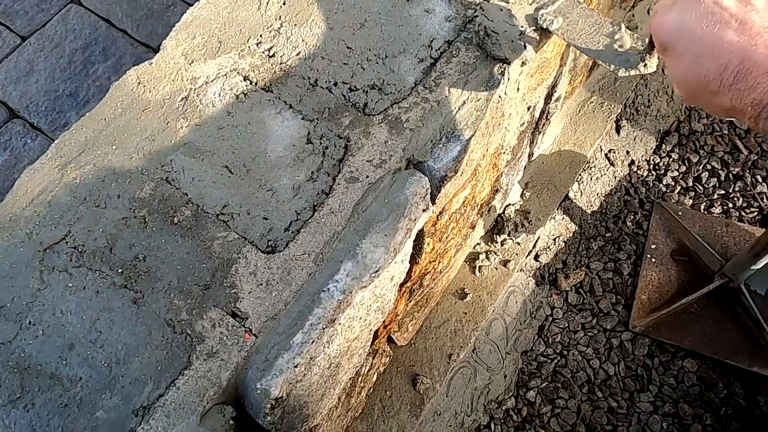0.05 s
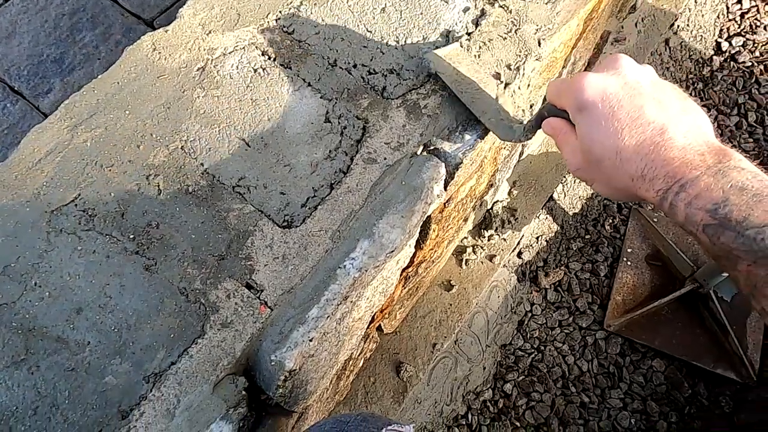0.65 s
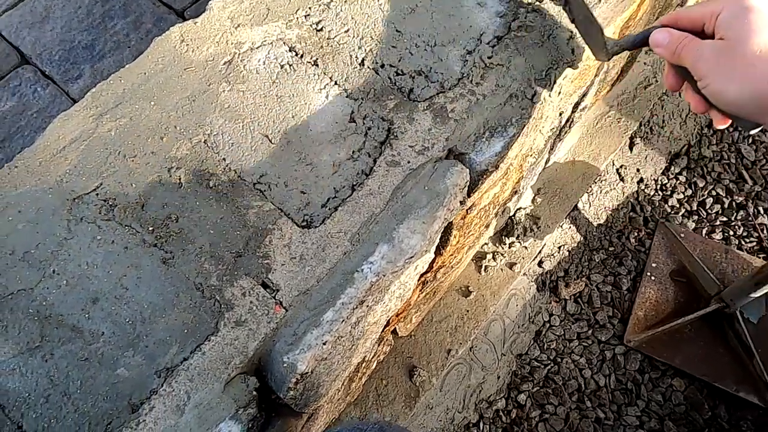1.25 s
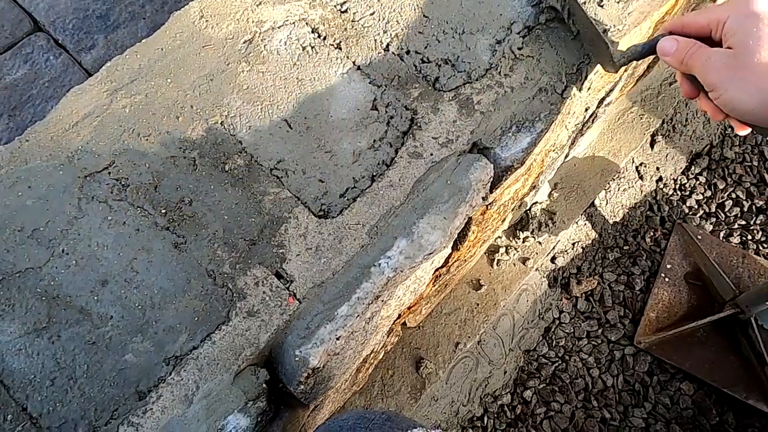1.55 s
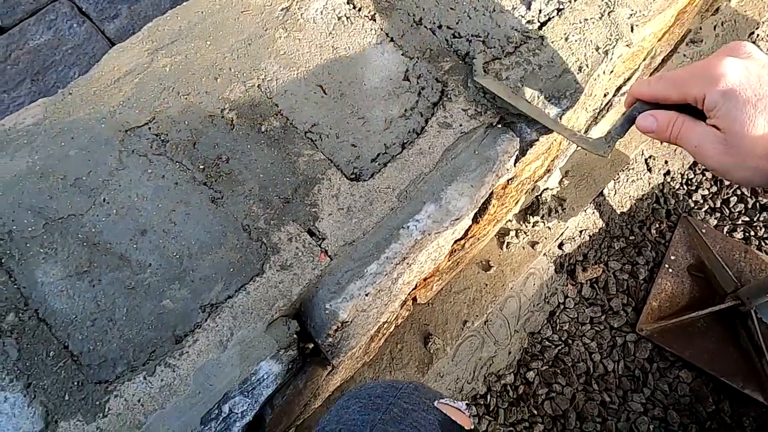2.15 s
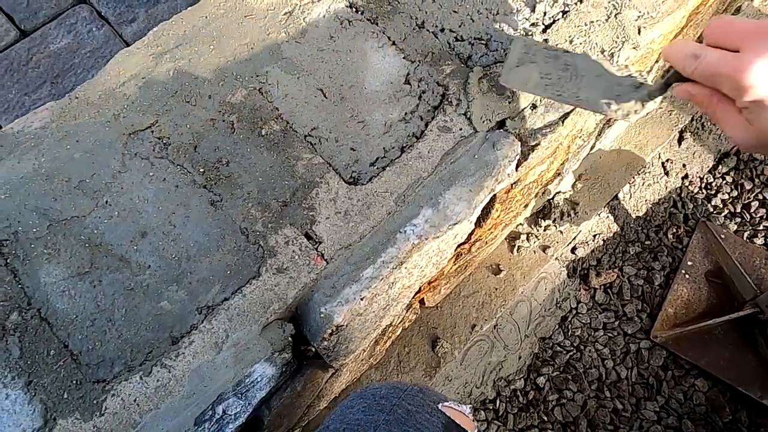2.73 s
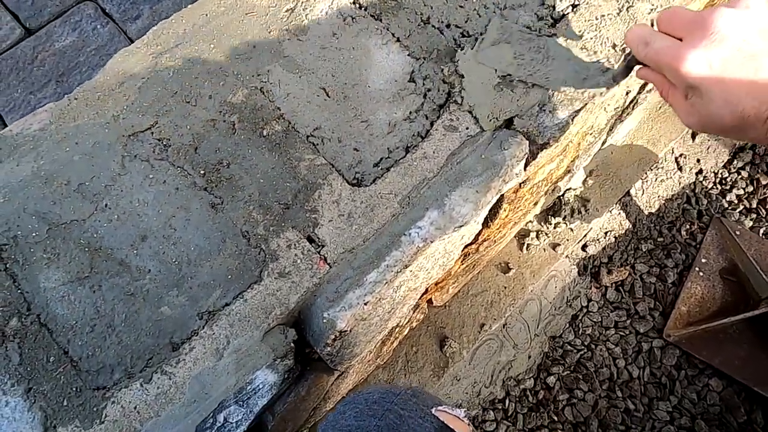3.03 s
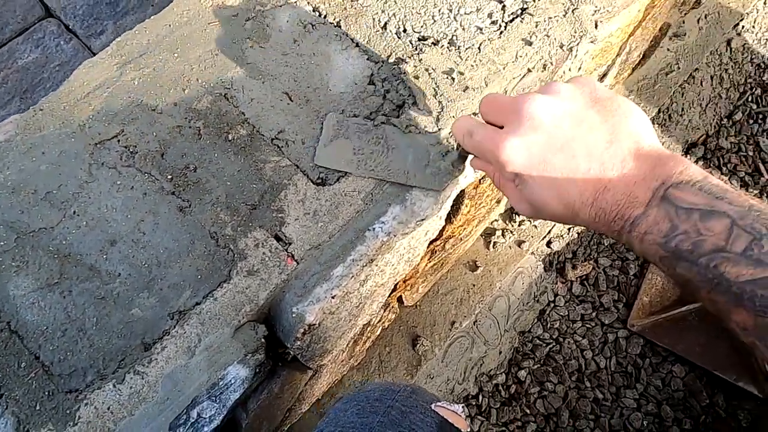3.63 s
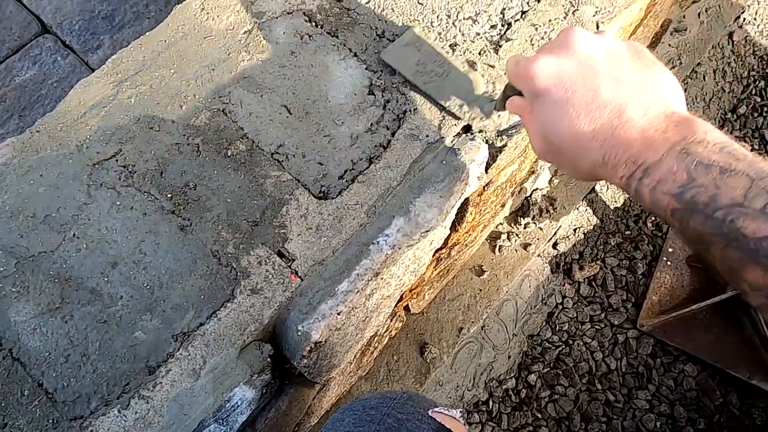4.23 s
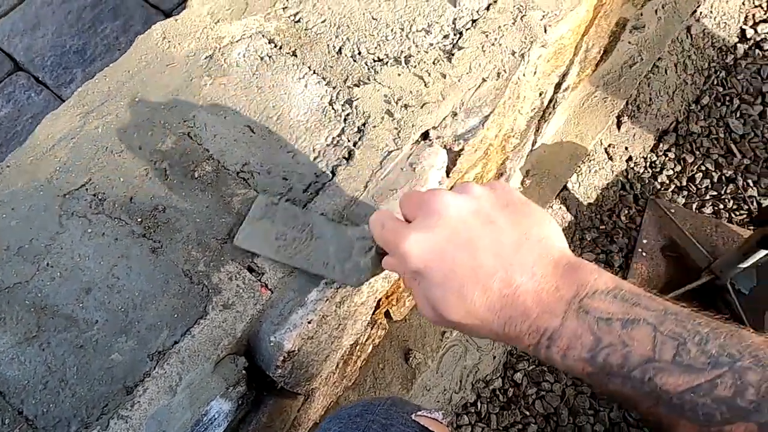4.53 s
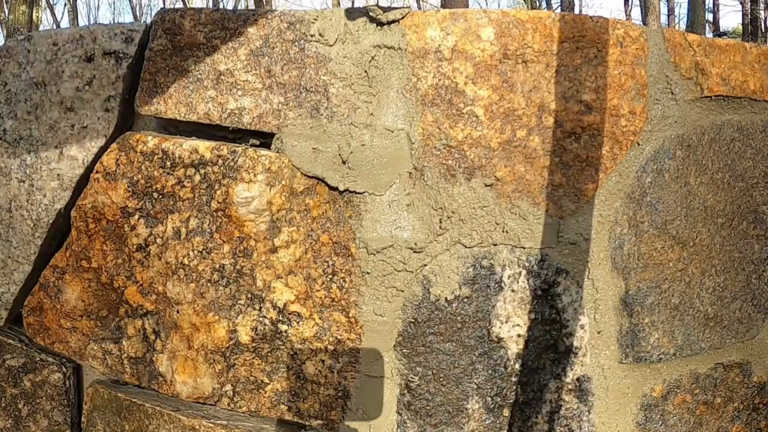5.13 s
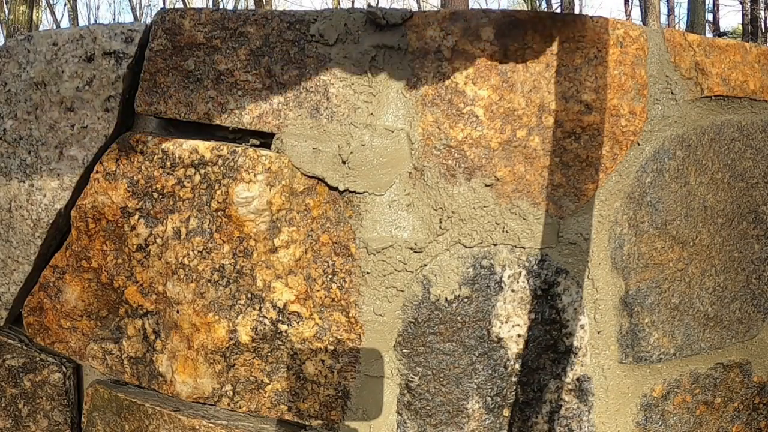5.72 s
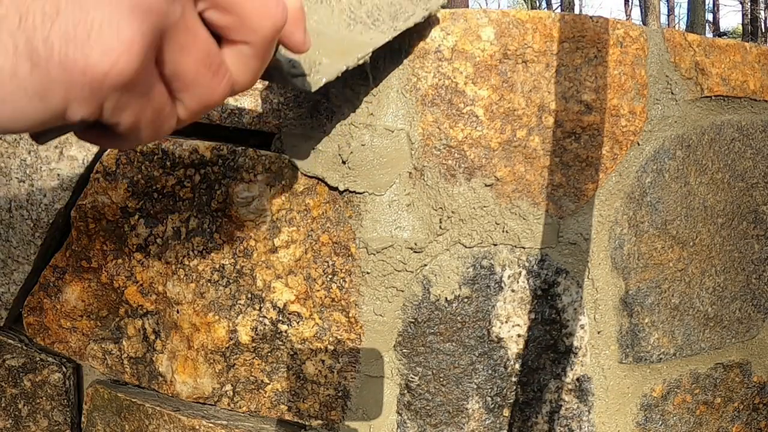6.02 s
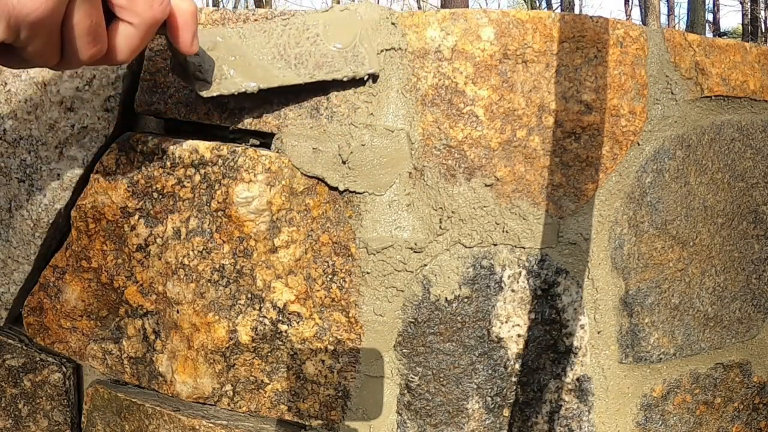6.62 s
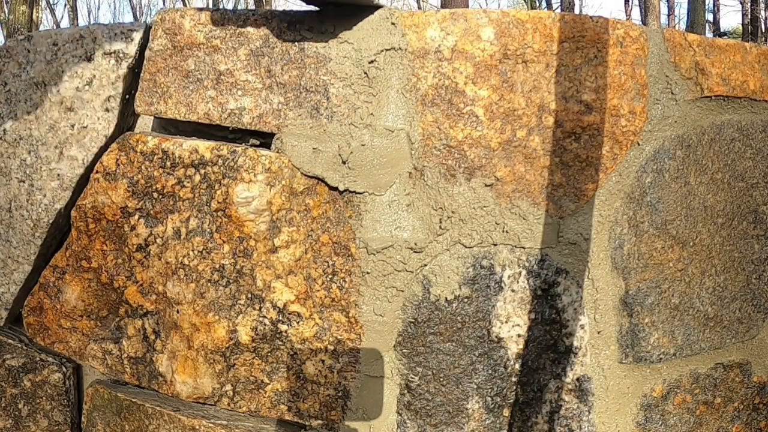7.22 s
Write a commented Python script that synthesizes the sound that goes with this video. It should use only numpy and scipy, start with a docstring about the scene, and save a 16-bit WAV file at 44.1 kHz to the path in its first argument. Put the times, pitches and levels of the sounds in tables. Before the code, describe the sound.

A steel trowel scrapes wet, sandy mortar into a stone wall, close by and outdoors. For the first second, quick gritty strokes make the blade ring briefly as grains catch under it. After a short gap, from about 1.4 seconds, the blade bears on stone and the scraping sounds hollower, with a slight knock. From 3 to about 4.6 seconds comes a loud, brighter run of strokes with a fine sandy fizz. After a pause, a short group follows from 5.2 to 5.6 seconds. Mostly lighter strokes return from 6.3 to 6.8 seconds, and a last small scrape comes at about 7.2 seconds. Coarse grains crack sharply under the edge along the way, the loudest slightly distorted. A faint low rumble continues in the distance throughout, with the faint hum of a far engine that swells a little between 5 and 6 seconds.

```python
"""A steel trowel scrapes wet mortar into a stone wall, outdoors, over a distant rumble and a faint hum.
It starts with quick strokes: sand grains catch under the blade and make the steel ring briefly.
From 1.4 s the blade bears on stone and sounds hollow. From 3 s comes a loud, brighter run of strokes.
After a pause, a short group follows at 5.2 s, then mostly lighter strokes from 6.3 s to the end.
Coarse grains crack along the way, and the loudest ones overload and flatten the sound's peaks."""
import sys
import numpy as np
from scipy import signal
from scipy.fft import rfft, irfft
from scipy.io import wavfile
from scipy.ndimage import uniform_filter1d

SR = 44100
rng = np.random.default_rng(int(sys.argv[2]) if len(sys.argv) > 2 else 0)


def transcribe(u):
    """Save the signal u as a 16-bit wav file named by the first command-line argument.

    u: samples, shape (n,) or (channels, n), limited to [-1, 1]; the rate is SR.
    q: integer samples, one column per channel.
    """
    v = np.clip(np.atleast_2d(u).T, -1, 1)
    q = np.round(v * 32767).astype(np.int16)
    wavfile.write(sys.argv[1], SR, q)


N = 320607
TIME = np.arange(N) / SR

# Tone of the distant rumble: pitch_hz, level_db
RUMBLE_TONE = [(15, -58), (55, -6), (100, -5), (195, -3), (300, -9), (400, -12), (570, -8.5), (850, -9.5),
               (1800, -18.5), (2800, -27), (4000, -36.5), (7000, -52.5), (9500, -58), (15000, -79)]
# The background level sinks and recovers over time: time_s, level_db
RUMBLE_LEVELS = [(0, -35), (.6, -37.5), (1.6, -33), (2, -36), (2.8, -31.5), (3.6, -39), (4.7, -38),
                 (5.3, -33.5), (5.8, -34.5), (6.4, -31), (6.7, -32.5), (7.27, -30.5)]
# How the hum of a far engine rises and falls: time_s, level_db
HUM_LEVELS = [(0, -46.5), (4.4, -62.5), (5.4, -37.5), (5.7, -47), (6.2, -38), (6.6, -62)]
# Strokes of the trowel. The swell runs from start to end; hollow, knock, sand and ring are shares:
# start_s, length_s, pressure_db, swell_db, hollow_db, knock_db, sand_db, pitch_hz, ring_db
STROKES = [(0, 0.11, -23, -13, -13, -38, -7.5, 2980, -7),
           (0.064, 0.023, -18, -1, -13, -15, -6.5, 2740, -10),
           (0.097, 0.067, -30.5, 8, -9, -22, -5, 2650, -3.5),
           (0.385, 0.063, -29.5, 13, -12, -23, -9, 2630.0, -19),
           (0.452, 0.062, -12, -1, -12, -42, -7.5, 2710, -24),
           (0.517, 0.091, -28.5, -11, -13, -19, -0.5, 3200, -19),
           (0.62, 0.15, -23, -0.5, -11.5, -24, -6, 2960, -19),
           (0.781, 0.026, -15, 1, 0.5, -23, -7, 2970, -23),
           (0.819, 0.064, -19.5, -0.5, 0.5, -16, -8, 3000, -18),
           (1.443, 0.038, -37.5, -3, 11.5, 1.5, 1, 2620.0, -23),
           (1.497, 0.068, -17.5, 6.5, -0.5, -6, -12.5, 2590, -22),
           (1.593, 0.08, -44, 11, -8, -8, -12, 2750, -22),
           (1.663, 0.096, -20, 3.5, 1.5, -4, -8.5, 2570, -20),
           (1.793, 0.086, -24.5, -5, 3.5, -7.5, -8, 2330, -16),
           (1.882, 0.122, -19.5, -3.5, -2, -12, -14, 2230, -10),
           (1.998, 0.14, -30, -2, -3, -6.5, -12.5, 2230, -19),
           (2.136, 0.23, -40.5, -23, -5.5, -16, -10, 2310.0, -13),
           (2.336, 0.22, -34, 7, -11, -13, -11.5, 2520, -23),
           (2.523, 0.16, -17.5, 10, -8, -18, -11, 2730, -15),
           (2.696, 0.027, -22, 0.5, -1, -31, -8.5, 2700, -4),
           (2.952, 0.18, -30, 18, -7, -14, -8.5, 2820, -13),
           (3.077, 0.13, -10, 3, -12, -27.5, -9.5, 3110, -10),
           (3.211, 0.072, -16.5, -16, -20.5, -35, -6, 2710, -8),
           (3.303, 0.041, -19.5, -11, -14, -24.5, -5, 2700, -8),
           (3.343, 0.056, -12.5, 0.5, -20.5, -40.5, -4, 3040, -8.5),
           (3.418, 0.019, -12, -0.5, -19.5, -39.5, -3, 3180, -10),
           (3.447, 0.076, -14, -8, -15.5, -36, -6.5, 2760, -5),
           (3.504, 0.15, -17, -7, -18, -48, -10, 2620, -12),
           (3.587, 0.1, -12, -10, -21.5, -47, -13, 2780, -6),
           (3.692, 0.06, -33, 0, -20, -28, -16, 2870, -13.5),
           (3.744, 0.073, -19.5, 6, -17.5, -21.5, -10.5, 2665, -5),
           (3.835, 0.034, -15, 1.5, -17.5, -16.5, -12.5, 2550, 2),
           (3.89, 0.068, -11.5, -2.5, -14.5, -25.5, -15, 2735, -6.5),
           (3.964, 0.033, -21.5, 6.5, -7, -22, -3.5, 2640.0, -8),
           (3.995, 0.16, -10.5, -7, -16.5, -40, -11.5, 2850, -14.5),
           (4.15, 0.037, -23.5, 27, -26, -37, -14.5, 2730, -14.5),
           (4.201, 0.19, -11.5, -4, -18, -44, -7.5, 3146, -9),
           (4.389, 0.1, -10, 1, -22, -50, -11, 2810, -14),
           (4.495, 0.15, -13.5, -0.5, -21.5, -33, -10.5, 3230, -9.5),
           (5.245, 0.085, -26.5, -10, -14.5, -14.5, -8.5, 3110, -7),
           (5.345, 0.075, -21.5, 18, -9.5, -26, -2.5, 2930, -5.5),
           (5.411, 0.056, -13, 8, -8, -30, -9.5, 2630, -3),
           (5.499, 0.079, -25.5, -1.5, -12, -33, -4, 2730, -7.5),
           (5.587, 0.041, -20, -6, -10, -14, 2, 3010, -3),
           (6.26, 0.027, -23.5, -12, -11, -21, -5.5, 2350, -3),
           (6.296, 0.048, -39, -7, -15, -20, -10, 2360, -7),
           (6.329, 0.012, -32, 12, -10, -16, -5.5, 2420, -1),
           (6.43, 0.012, -22, -3, -13, -14, -4.5, 2620, -7),
           (6.46, 0.1, -21.5, -8.5, -12, -24, -6.5, 2580, -8),
           (6.539, 0.19, -29, 10, -11.5, -20, -8, 3040, -17),
           (6.741, 0.045, -18, -2.5, -17, -35, -7, 2920, -5.5),
           (6.98, 0.075, -61, 0, -10, -15, -7, 3200, -6), (7.18, 0.056, -47, 8.5, -12, -15, -1, 3220, -5),
           (7.226, 0.024, -24.5, 5.5, -8, -18, -5.5, 2820, -8)]
# Bites of the edge on coarse grains: start_s, level_db, pitch_hz
BITES = [(0.4482, -1, 2500), (0.4604, -4, 2490), (0.504, -4, 2740), (0.5816, -13, 3150), (0.6579, -6, 2960),
         (0.7605, -7, 2750), (0.778, 0, 3220), (0.8, -6.5, 3380), (1.4374, -14.5, 1650),
         (1.497, -6.5, 2160), (1.5743, -1, 2490), (1.6749, -0.5, 2350), (1.699, -6, 2620),
         (1.7124, 1.5, 1510), (1.7284, 0.5, 2520), (1.7494, -2, 2430), (1.7988, -15, 1900),
         (1.8332, -2, 2020), (1.884, -6, 1590), (1.8973, 2.5, 2430), (1.958, -4, 2210), (1.9844, -6, 2250),
         (2.0534, -10.5, 2060), (2.1101, -8.5, 2220), (2.396, -18.5, 2400), (2.5716, -2, 2300),
         (2.6254, -6.5, 2430), (3.056, -12, 2600), (3.0762, 0, 1900), (3.0936, 3, 1730), (3.2085, -2, 2440),
         (3.2944, -19, 2680), (3.313, -7, 2220), (3.3527, -5, 2830), (3.4552, -1.5, 2590),
         (3.488, 0.5, 2560), (3.7374, -9.5, 2420), (3.7636, -2.5, 2610), (3.862, -6, 2500),
         (3.8856, -3, 2800), (4.2018, 2, 2710), (4.2501, 2, 3690), (4.3535, 2, 3100), (4.4638, 0, 3680),
         (5.253, -10.5, 2580), (5.3795, -1, 3050), (5.4031, 4, 2580), (5.4728, 2.5, 2360),
         (5.4868, 0, 2440), (5.5919, -7, 3350), (5.8794, -36, 1740), (6.2646, -12, 2290),
         (6.4333, -8, 2650), (6.5075, -0.5, 2390), (6.5361, -2, 2750), (6.7458, -1, 3060),
         (7.2297, -10, 2580)]
# Tone of the scraping blade: pitch_hz, level_db
BLADE_TONE = [(600, -42), (1400, -24), (1650, -11.5), (1850, -1), (2700, -3.5), (3300, -4.5), (4000, -2.5),
              (4600, -4), (5200, -12.5), (6500, -42), (9000, -45)]
# Hollow tone of the stone: pitch_hz, level_db
STONE_TONE = [(200, -41), (450, -14.5), (720, -8), (950, -4), (1250, 3.5), (1550, 4), (1900, -3.5),
              (2600, -0.5), (5000, -35)]
# Low knock of the whole tool: pitch_hz, level_db
KNOCK_TONE = [(170, -33), (290, -9.5), (370, 1.5), (460, 5), (530, -4), (650, -24), (1200, -42.5)]
# Fizz of the fine sand: pitch_hz, level_db
SAND_TONE = [(2500, -37), (4400, -6), (5100, -2), (5750, 1.5), (6400, -0.5), (7100, -4.5), (8500, -10.5),
             (9200, -5), (10500, -8), (12000, -11), (13200, -24), (15500, -37)]
# Notes of the blade, damped by mortar (a wider note dies sooner): pitch_hz, width_hz, level_db
STEEL_NOTES = [(2220, 34, -4.5), (2580, 60, -6), (2920, 15, -2.5), (3430, 81, -9), (3790, 18.6, 6.5),
               (4360, 41, -7), (3990, 60, -8), (5730, 44, -2.5), (9400, 260, -20)]
# Stereo side signal, relative to what left and right share: pitch_hz, level_db
SIDE_TONE = [(700, -39), (2200, -73), (4400, -38), (8100, -21), (10500, -24), (12500, 2.5), (15000, 4.5)]


def gain_of(db):
    """Turns decibels into a factor to multiply by."""
    return 10 ** (np.asarray(db) / 20)


def evened(x):
    """Scales a signal to an average (rms) level of 1."""
    return x / np.sqrt(np.mean(x ** 2) + 1e-20)


def add(mix, start_s, sound):
    """Lays a sound into the mix at start_s."""
    part = mix[max(round(start_s * SR), 0):][:len(sound)]
    part += sound[:len(part)]


def convolve(x, response):
    """Passes x through a filter or echo and keeps its length."""
    return signal.oaconvolve(x, response)[:len(x)]


def tone_filter(tone, size=4096):
    """Turns a tone table into a filter that sounds only after it is struck."""
    hz, db = np.transpose(tone)
    bins_hz = abs(np.fft.fftfreq(size, 1 / SR)) + 1
    log_gain = np.log(gain_of(np.interp(np.log(bins_hz), np.log(hz), db)))
    return np.fft.ifft(np.exp(np.conj(signal.hilbert(log_gain)))).real


def resonate(x, hz, width_hz):
    """Lets x ring at a pitch that may move."""
    turn = np.exp(2j * np.pi * np.cumsum(hz * np.ones(len(x))) / SR)
    decay = np.exp(-np.pi * width_hz / SR)
    return 2 * (turn * signal.lfilter([1 - decay], [1, -decay], x / turn + 1e-18)).real


def wander(per_s):
    """A smooth random curve of level 1 that changes up to about per_s times a second."""
    t = TIME[::64]
    spectrum = rfft(rng.standard_normal(len(t))) / (1 + (np.fft.rfftfreq(len(t), t[1]) / per_s) ** 4)
    return np.interp(TIME, t, evened(irfft(spectrum, len(t))))


def background(rumble_db=1, hum_hz=130):
    """Low noise rumbles in the distance, and a far engine hums on one wavering note."""
    rumble = evened(convolve(rng.standard_normal(N), tone_filter(RUMBLE_TONE)))
    rumble *= gain_of(rumble_db + np.interp(TIME, *np.transpose(RUMBLE_LEVELS)))
    pitch_hz = hum_hz * (1 + 0.0025 * wander(8))
    hum = evened(np.sin(2 * np.pi * np.cumsum(pitch_hz) / SR))
    return rumble + hum * gain_of(np.interp(TIME, *np.transpose(HUM_LEVELS)) + 1.3 * wander(4.6))


def echoes(sound, decay_s, size):
    """Hard surfaces send back a cloud of fading echoes after a short gap."""
    samples = np.arange(size)
    cloud = rng.standard_normal(size) * np.exp(-samples / SR / decay_s) * (samples > size // 64)
    return convolve(sound, cloud / np.linalg.norm(cloud))


def hand_motion(attack_s=0.003, attack_share=0.09, arch_db=2, lift_s=0.01, octaves_per_db=0.0133):
    """The hand's strokes as curves over time: pressure, hollow, knock, sand, pitch and ring."""
    power, curves = np.zeros(N), np.zeros((5, N))
    for start, length, db, swell_db, hollow_db, knock_db, sand_db, hz, ring_db in STROKES:
        t = np.arange(round((length + 4 * lift_s) * SR)) / SR
        progress = np.minimum(t / length, 1)
        push_db = swell_db * (progress - .5) + arch_db * (np.sin(np.pi * progress) - .5)
        ease_in = np.minimum(t / (attack_s + attack_share * length), 1)
        lift_off = np.exp(-(np.maximum(t - length, 0) / lift_s) ** 2)
        pitch_hz = hz * 2 ** (octaves_per_db * push_db)  # pressing harder raises the pitch
        weight = (ease_in * lift_off * gain_of(db + push_db)) ** 2
        add(power, start, weight)
        # where strokes overlap, the stronger one counts more
        for curve, value in zip(curves, (hollow_db, knock_db, sand_db, pitch_hz, ring_db)):
            add(curve, start, weight * value)
    touching = power > 0
    blended = [np.interp(TIME, TIME[touching], curve[touching] / power[touching]) for curve in curves]
    return np.sqrt(power), *blended


def grains(per_s, spread_db):
    """Sand grains click at random: many small, a few large."""
    size = gain_of(spread_db * np.minimum(rng.exponential(1, N), 5))
    return evened(size * rng.choice([-1, 1], N) * (rng.random(N) < per_s / SR))


def steadied(x, size=800):
    """Evens out the scrape's loudness over about 20 ms, however the single grains fall."""
    return x / np.sqrt(uniform_filter1d(uniform_filter1d(x ** 2, size), size // 2) + 1e-9)


def steel_ring(force, drift=0.0043):
    """The blade rings at its own notes, which shift as the contact point slides."""
    return sum(gain_of(db) * resonate(force, hz * (1 + drift * wander(5.3)), width_hz)
               for hz, width_hz, db in STEEL_NOTES)


def chirping(force, hz, spread, width_hz):
    """Three points of the edge touch in turn, each tuning the blade in its own shifting way."""
    return sum(resonate(force * gain_of(3.2 * wander(100)), hz * np.exp(spread * wander(51.5)), width_hz)
               for _ in range(3))


def sticking(stick_s=0.0063, depth=0.12):
    """Just before each bite the edge is held fast and the scrape dips a little."""
    held = np.zeros(N)
    dip = signal.windows.hann(round(2 * stick_s * SR))
    for start_s, *_ in BITES:
        add(held, start_s - 2 * stick_s, dip)
    return 1 - depth * np.minimum(held, 1)


def bites(motion, level_db=-1, crumble_s=0.0036, crumble_db=-14, stone_db=-5, sand_db=-14, ring_db=-5):
    """Each coarse grain cracks under the edge and crumbles, as hollow as the stroke it falls in."""
    cracks, t = np.zeros(N), np.arange(SR // 16) / SR
    blade, stone, sand = map(tone_filter, (BLADE_TONE, STONE_TONE, SAND_TONE))
    for start_s, db, hz in BITES:
        hollow_db = np.interp(start_s + 0.003, TIME, motion[1])
        crumbs = gain_of(crumble_db) * rng.standard_normal(len(t)) * np.exp(-t / crumble_s)
        force = (t == 0) + crumbs  # one sharp click comes first
        tick = convolve(force, blade)
        crack = evened(0.12 * tick + resonate(tick, hz, width_hz=160))
        crack += gain_of(stone_db + hollow_db) * evened(convolve(force, stone))
        crack += gain_of(sand_db) * evened(convolve(force, sand))
        add(cracks, start_s, gain_of(level_db + db) * crack / abs(crack).max())
    return cracks + gain_of(ring_db) * steel_ring(cracks)


def scrape(motion, slip_db=3.5, dig_db=-20, judder_db=1.66, free_ratio=0.93, zing_hz=5950):
    """The blade sticks and slips over sand, whose grains sound the steel, the stone and a fine fizz."""
    pressure, hollow_db, knock_db, sand_db, blade_hz, ring_db = motion
    shake_db = judder_db + np.minimum(gain_of(hollow_db), 1)  # the tool shakes more on stone
    judder = gain_of(shake_db * np.minimum(wander(52), 1.5))
    slips = gain_of(slip_db * wander(270))
    digging = np.clip(pressure / gain_of(dig_db), .35, 1)  # a light touch glides over coarse grains
    coarse = digging * grains(per_s=1800, spread_db=0.5)
    on_blade, on_stone, on_sand = (slips * (coarse + 0.96 * grains(per_s=5000, spread_db=4))
                                   for _ in range(3))
    ring = gain_of(7 + ring_db) * steel_ring(on_blade)
    blade = convolve(on_blade + ring, tone_filter(BLADE_TONE))
    blade = 0.41 * blade + chirping(blade, blade_hz, spread=0.11, width_hz=310)
    # the note that the contact leaves most free sings, drifting as the edge digs in
    free_hz = free_ratio * blade_hz * (1 + .05 * digging ** 2 * wander(9))
    singing = resonate(on_blade, free_hz * (1 + .016 * digging * wander(70)), width_hz=35)
    singing = resonate(singing, free_hz, width_hz=450)
    stone = convolve(on_stone, tone_filter(STONE_TONE))
    knock = convolve(on_stone, tone_filter(KNOCK_TONE))
    sand = convolve(on_sand + ring, tone_filter(SAND_TONE))
    sand = 0.7 * sand + chirping(sand, zing_hz, spread=0.077, width_hz=180)
    layers = [(blade, -1), (singing, ring_db), (stone, hollow_db),
              (knock, knock_db), (sand, sand_db - 1.03)]
    friction = sum(gain_of(db) * steadied(layer) for layer, db in layers)
    return sticking() * pressure * judder * friction


def scene(wall_db=-12, yard_db=-33):
    """Mixes the trowel, its echoes off the wall and the yard, and the background in stereo."""
    motion = hand_motion()
    trowel = scrape(motion) + bites(motion)
    wall = gain_of(wall_db) * echoes(trowel, decay_s=0.01, size=2048)
    yard = gain_of(yard_db) * echoes(trowel, decay_s=0.026, size=12000)
    mid = trowel + wall + yard + background()
    # the fine fizz reaches left and right out of step
    side = convolve(mid, np.pad(tone_filter(SIDE_TONE), (31, 0)))
    return np.array([mid + side, mid - side])


def record(dry, cutoff_hz=15600):
    """Flattens peaks that overload, then cuts off the highest treble."""
    flattened = dry / (1 + dry ** 8) ** (1 / 8)
    low_pass = signal.firwin(511, cutoff_hz, window=("kaiser", 9), fs=SR)
    return signal.oaconvolve(flattened, low_pass[None], "same")


dry = scene()
out = record(dry)
transcribe(out)
```